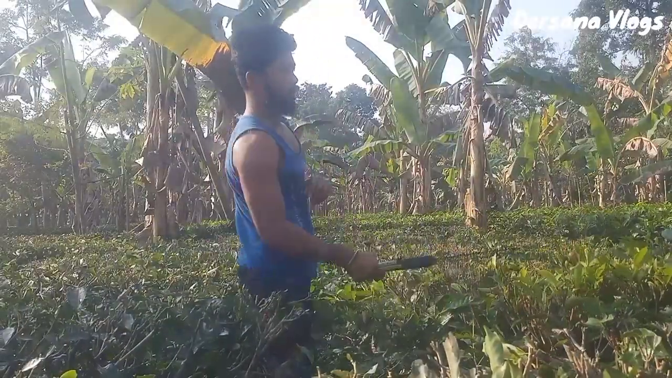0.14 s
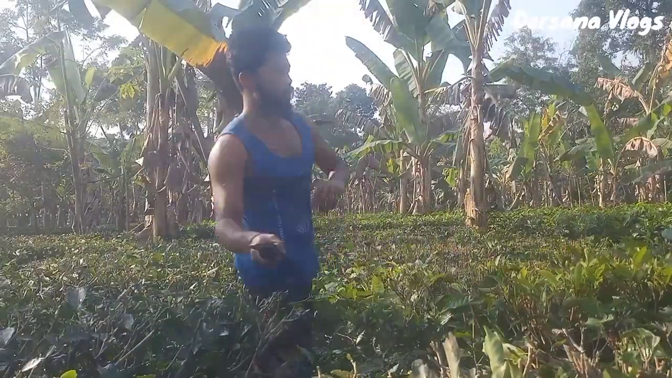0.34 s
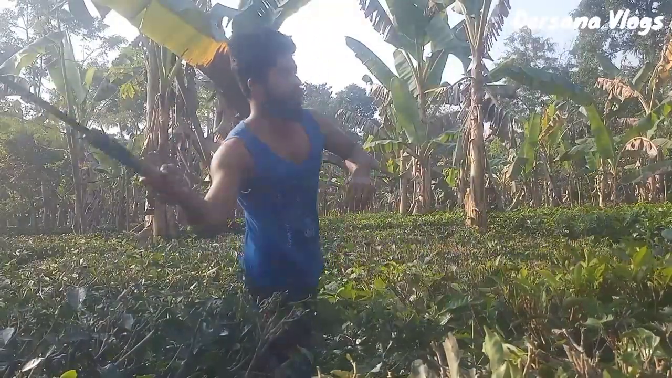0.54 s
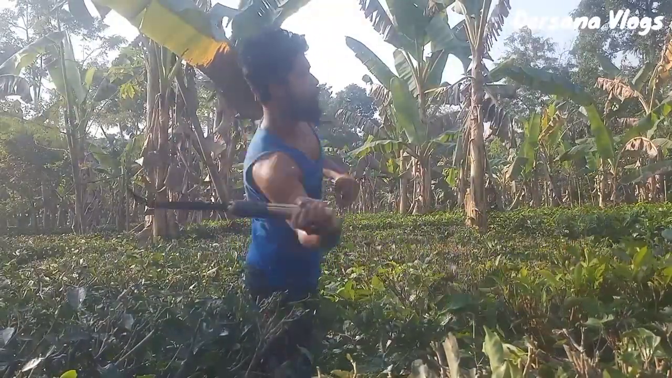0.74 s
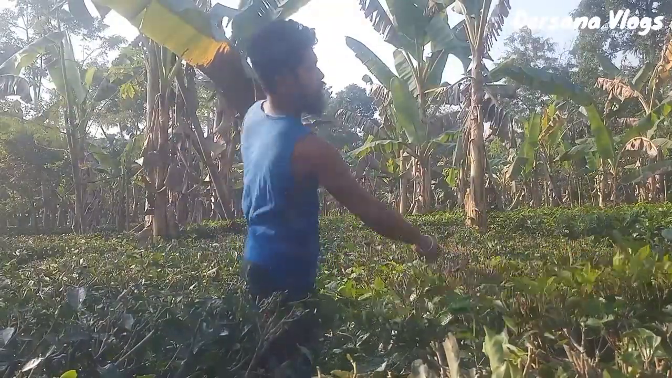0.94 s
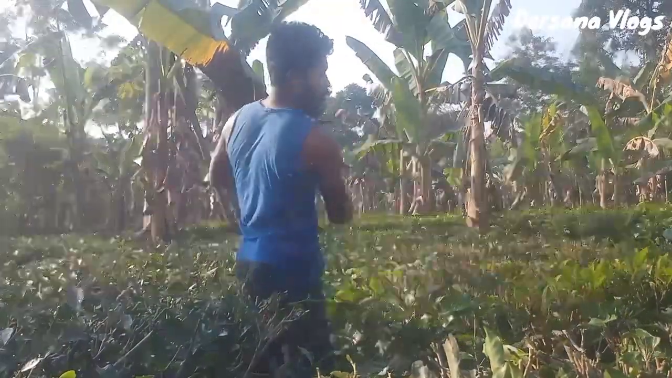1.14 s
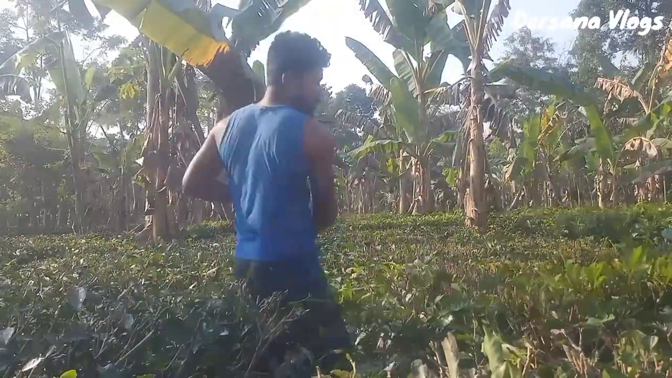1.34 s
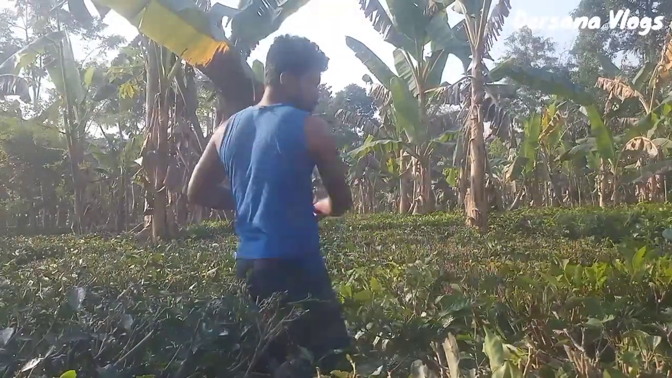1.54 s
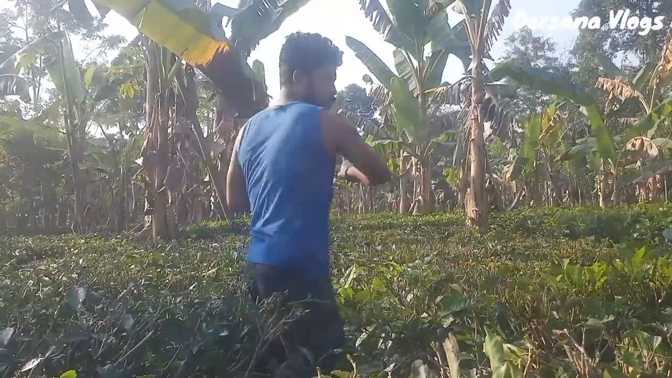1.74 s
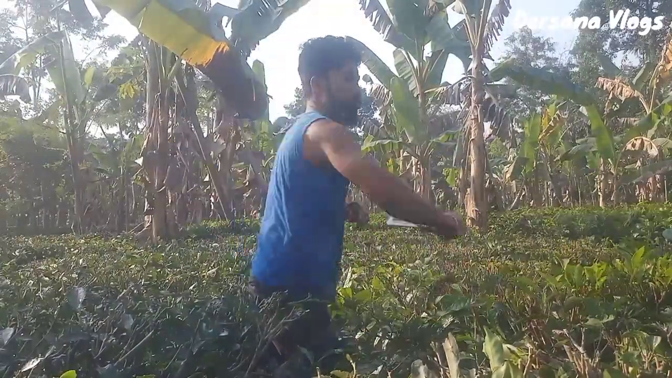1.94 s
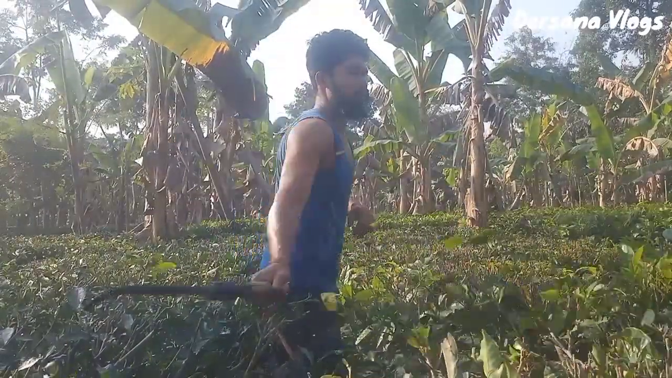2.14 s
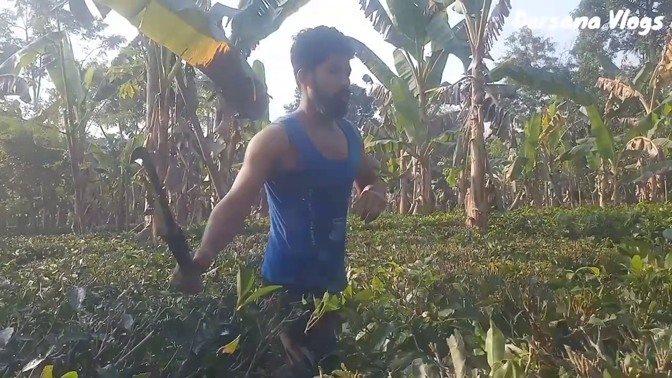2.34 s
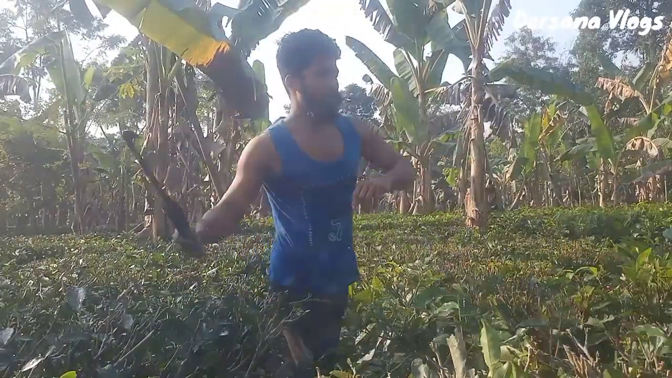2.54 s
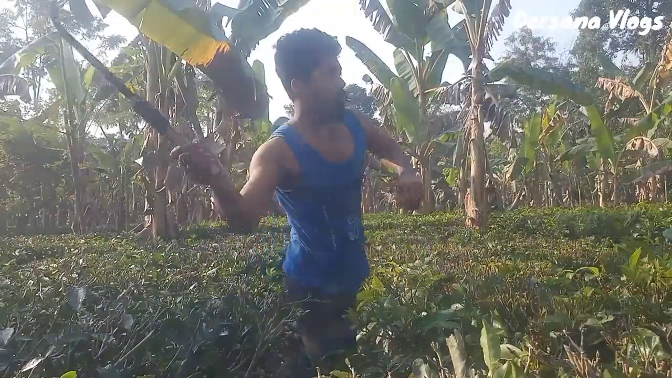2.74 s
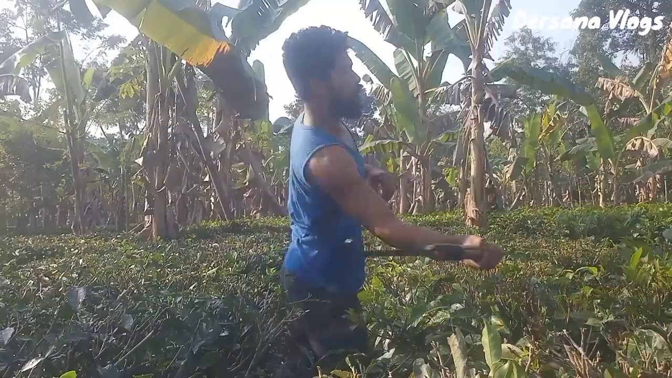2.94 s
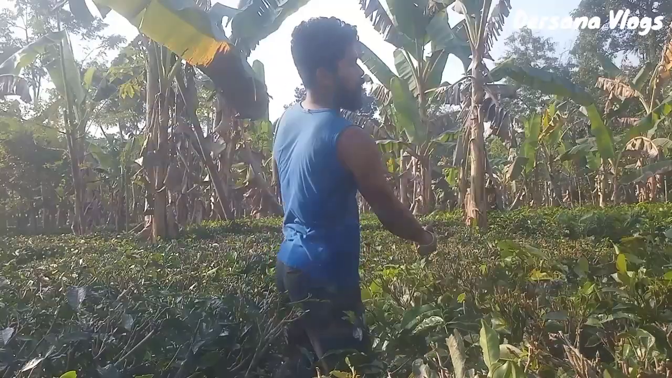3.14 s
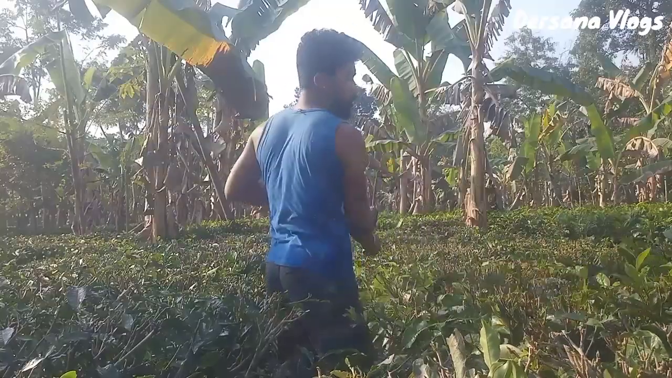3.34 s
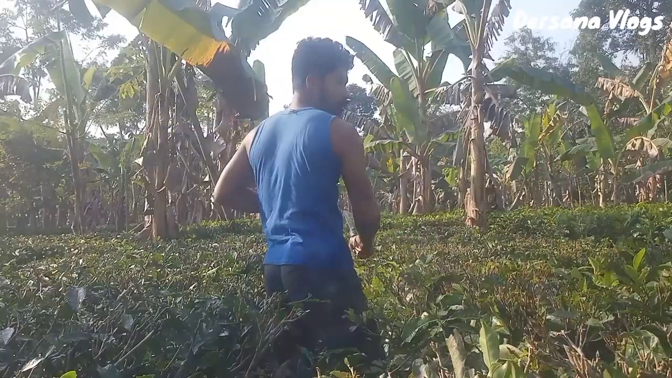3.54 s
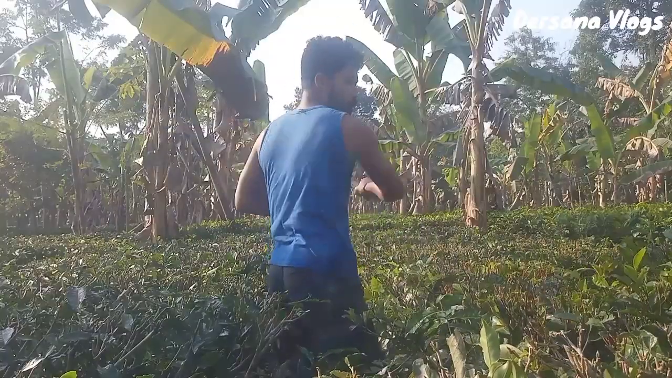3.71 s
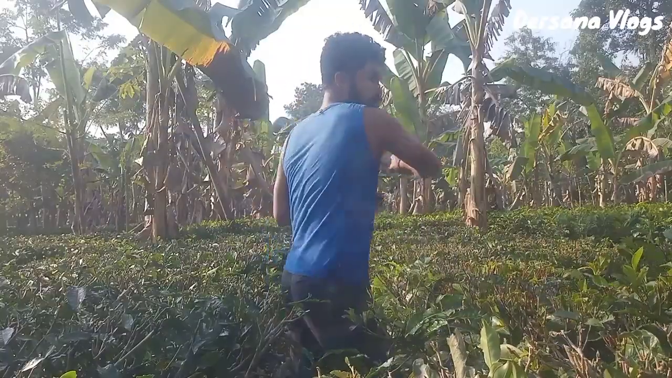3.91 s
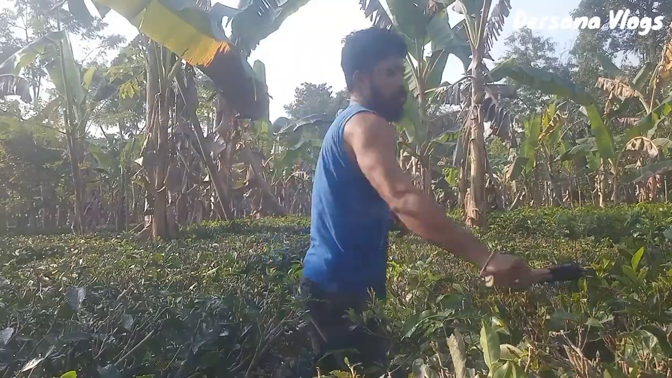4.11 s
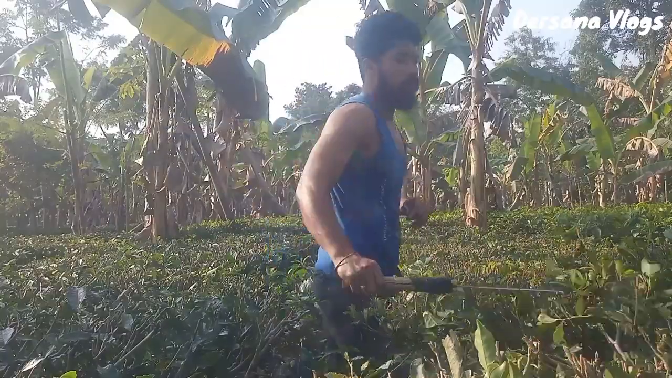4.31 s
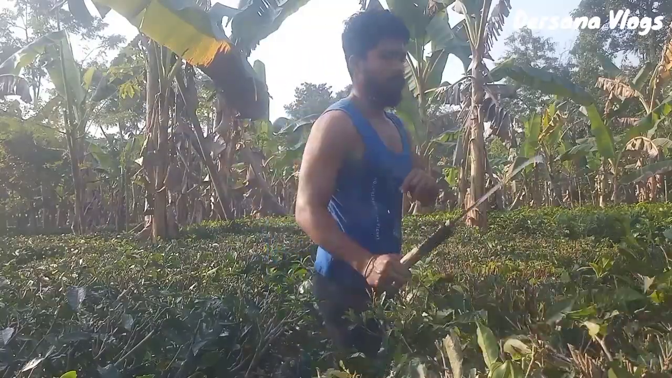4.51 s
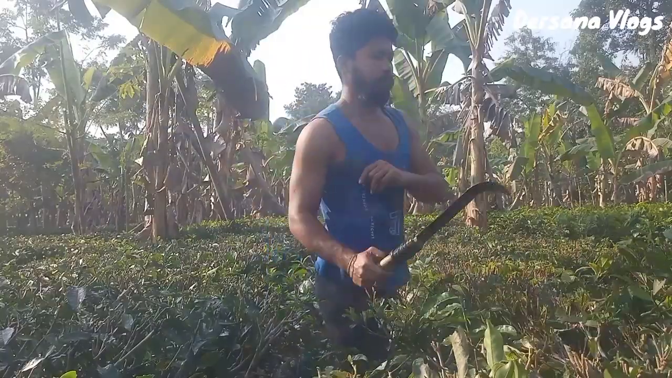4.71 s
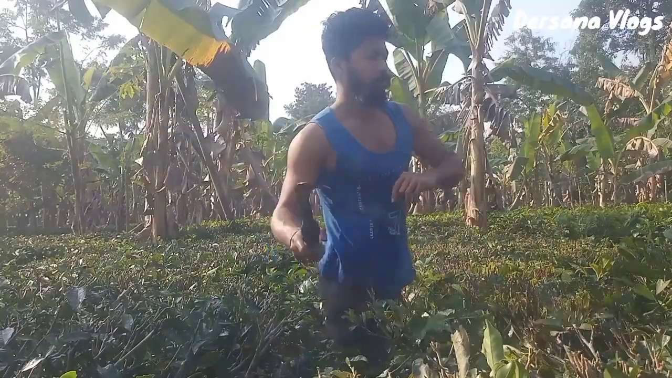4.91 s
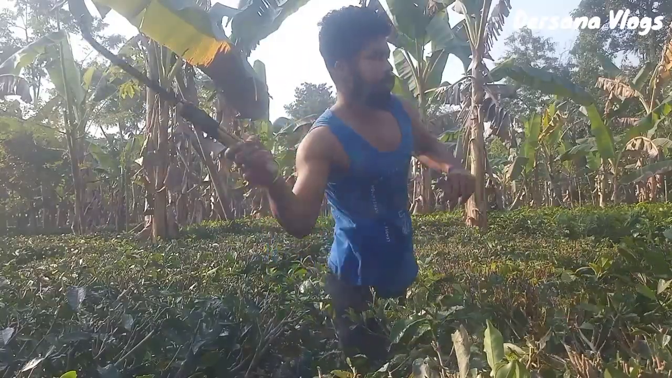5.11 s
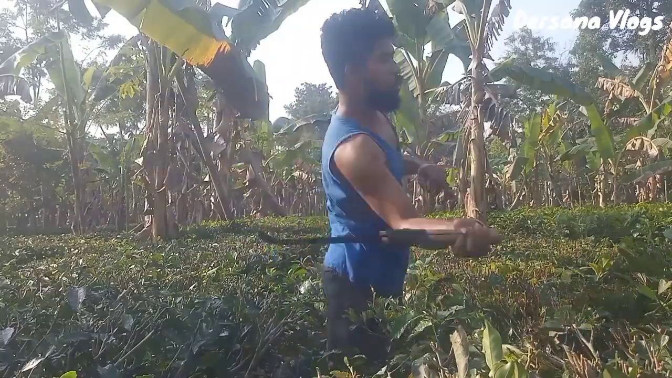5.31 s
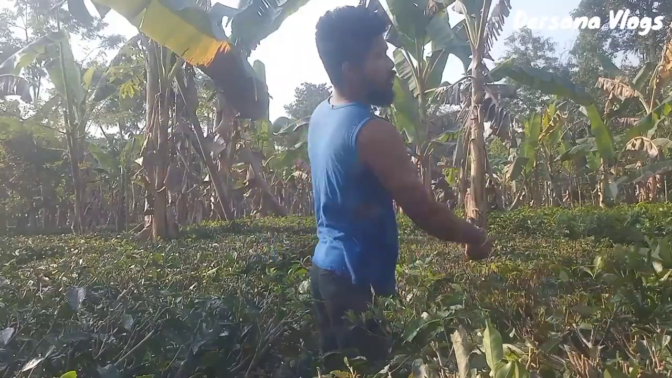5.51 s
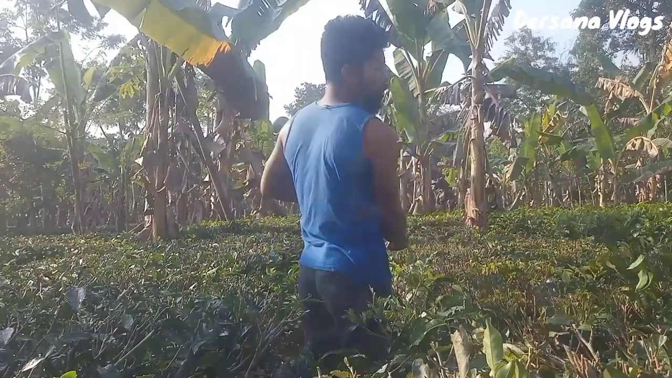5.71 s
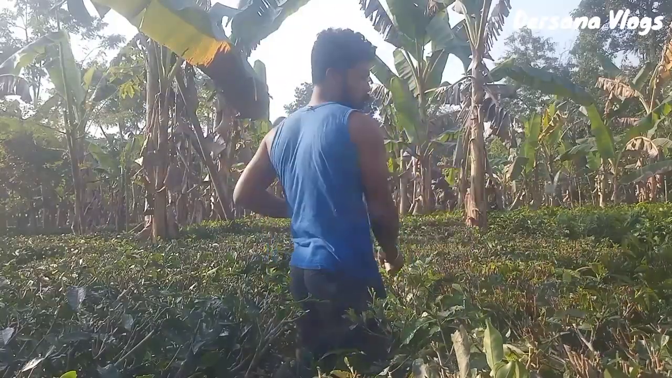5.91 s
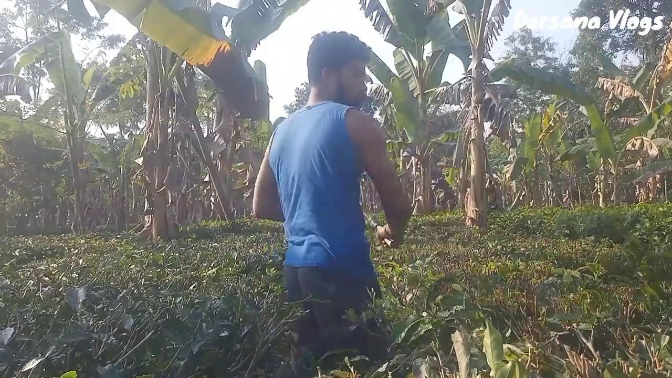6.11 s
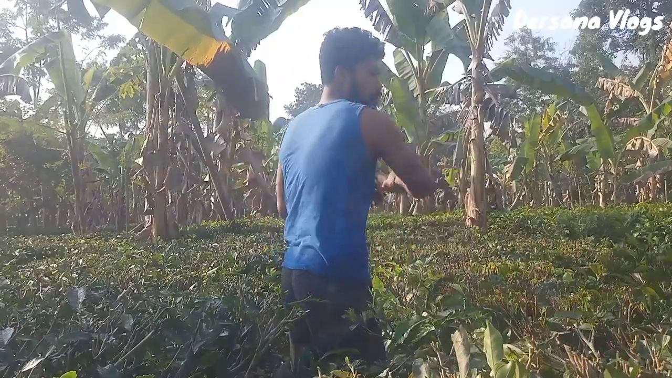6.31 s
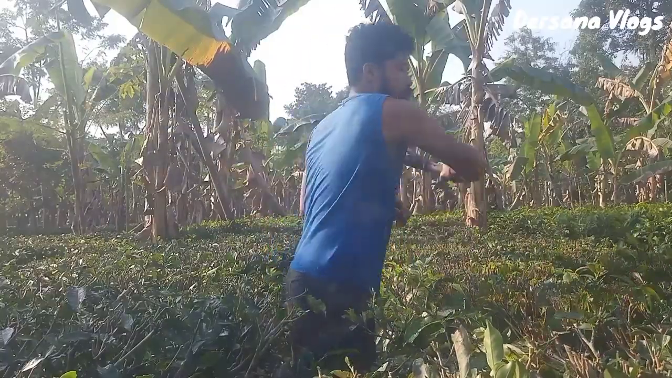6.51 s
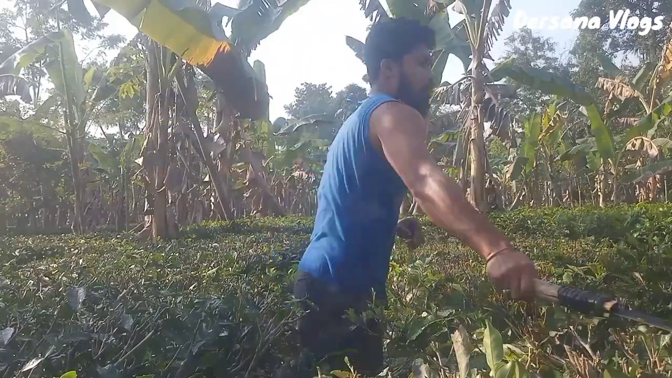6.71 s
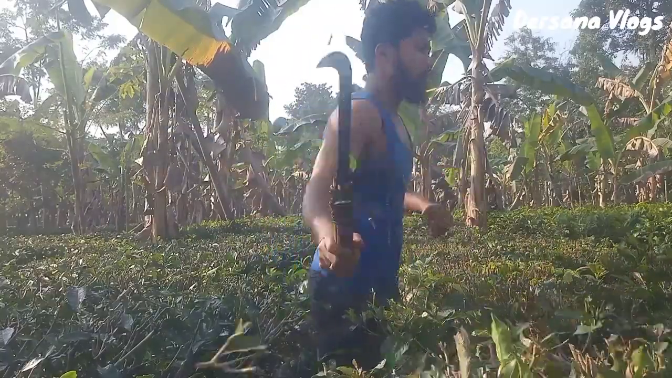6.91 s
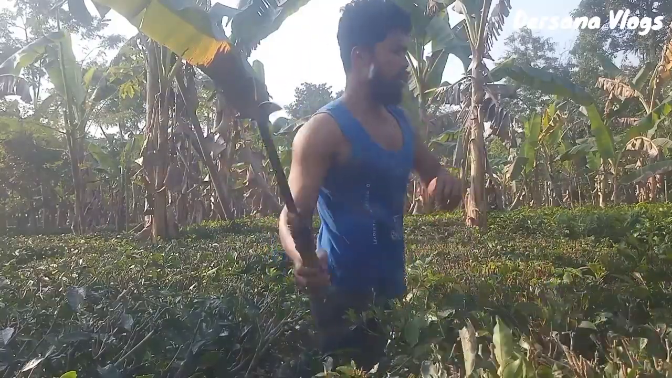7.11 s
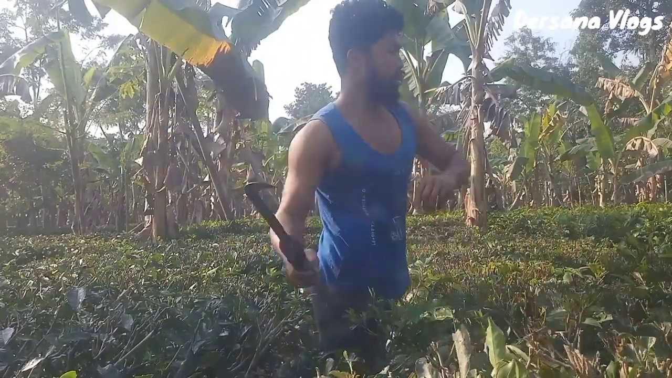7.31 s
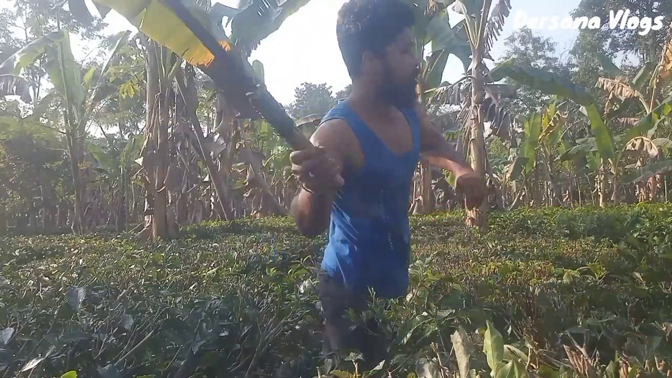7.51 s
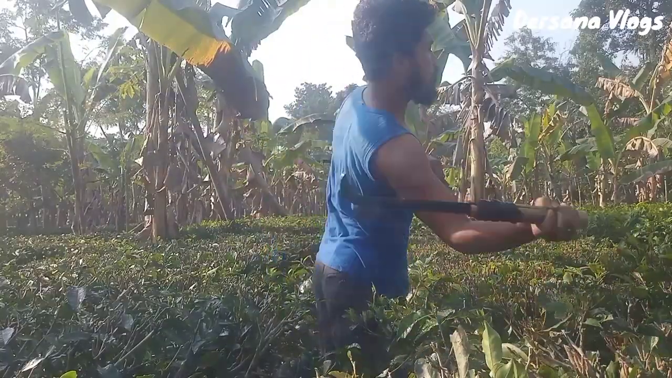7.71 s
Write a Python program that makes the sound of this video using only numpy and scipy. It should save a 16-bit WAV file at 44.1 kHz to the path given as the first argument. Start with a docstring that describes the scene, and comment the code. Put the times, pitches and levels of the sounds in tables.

```python
"""Slashing through bushes.

A long hooked blade cuts low leafy bushes six times, each stroke tearing a burst of fibres and stalks.
Cut bushes spring back, rustle and settle; legs and arm push through the leaves, twigs snap, wood knocks.
A small bird chirps thinly over faint open air. The loudest peaks overload the nearer, right microphone;
the left one is shadowed and hears the work later and duller."""
import sys
import numpy as np
from scipy import signal
from scipy.fft import rfft, irfft, next_fast_len
from scipy.io import wavfile

SR = 44100
rng = np.random.default_rng(int(sys.argv[2]) if len(sys.argv) > 2 else 0)


def store_wav(level_fs):
    """Save 16-bit WAV to argv[1]."""
    pcm = np.round(np.clip(np.atleast_2d(level_fs), -1, 1) * 32767)
    wavfile.write(sys.argv[1], SR, pcm.T.astype(np.int16))


N = 341775

# Each row: first touch, full bite and exit in seconds, level in dB, touch in dB re bite,
# drop on exit in dB, fade t60 in seconds, thud of thick stems in dB re bite.
BLADE_STROKES = [(1.049, 1.068, 1.086, -8.3, -18, -5.5, .22, -18),
                 (2.219, 2.229, 2.247, -6.5, -24, -3.5, .28, -16),
                 (3.191, 3.201, 3.218, -5.7, -26, -4.5, .25, -14),
                 (4.322, 4.329, 4.362, -7.7, -20, -4.0, .23, -14),
                 (5.583, 5.588, 5.611, -7.5, -24, -3.0, .25, -21),
                 (6.877, 6.882, 6.905, -9.0, -13, -1.5, .42, -16)]
# Cut bushes springing back, the first from an earlier stroke. Each row: start in seconds, shaking in dB,
# calming in dB per second, lingering rustle in dB, hush during the arm's next wind-up in dB.
BUSH_RECOILS = [(-.20, -27, 85, -46, 5.5), (1.089, -34, 90, -45.5, 3.5), (2.25, -28, 59, -43.5, 1.5),
                (3.22, -28, 90.5, -44, 1.5), (4.36, -29.5, 42.5, -44, 9), (5.61, -28.5, 112.5, -44.5, 4),
                (6.91, -28.5, 60, -43, -6)]
# Limbs in the bushes. Each row: middle and ramp in seconds, leaf level in dB, branches in dB re leaves.
LIMB_PUSHES = [(.28, 0.06, -50.5, -2.5), (.41, 0.041, -56.5, 0), (0.582, 0.024, -54.5, 0.5),
               (.82, 0.039, -55, -0.5), (1.248, 0.023, -47, 8), (1.42, 0.12, -54, 2.5),
               (1.758, 0.16, -49.5, -8), (2.80, 0.042, -46, -7), (2.89, 0.045, -49, -4),
               (3.019, 0.019, -41.5, -14), (3.60, 0.055, -46, -5.5), (4.05, 0.081, -60.5, -1),
               (4.632, .11, -36.5, -10.5), (4.90, 0.053, -46, -11), (5.28, 0.059, -51.5, -19),
               (5.858, 0.053, -45, -3), (6.318, 0.061, -48.5, -2), (6.522, .06, -51, -6.5),
               (7.20, 0.083, -39, -6.5), (7.37, 0.094, -44.5, -4)]
# Each row: start in seconds, relative level in dB, pitch and width in Hz, splintering t60 in seconds.
TWIG_SNAPS = [(0.2597, -19, 1640, 1290, .011), (0.8186, -21, 2070, 2600, 0.026),
              (0.915, -33, 2530, 400, 0.02), (1.072, -2, 2450, 900, 0.025), (1.181, -18, 2400, 3000, 0.029),
              (1.243, -15, 705, 1500, .022), (1.4255, -20, 1500, 2500, 0.042),
              (1.671, -20.5, 1870, 2300, 0.05), (1.7073, -23.5, 2760, 1500, .015),
              (2.3583, -10, 3000, 7000, 0.016), (3.0706, -14, 1840, 5400, 0.015),
              (3.7068, -22.5, 2000, 2600, 0.021), (3.7799, -21.5, 2370, 2000, 0.028),
              (4.0394, -21.5, 1820, 1600, 0.099), (4.3151, -3, 3160, 5000, .036),
              (4.4566, -8, 2400, 3500, .035), (5.0222, -22.5, 2200, 2800, .018),
              (5.636, -1, 1300, 3500, 0.055), (5.6664, -12, 2200, 4000, .022),
              (5.7258, -3.5, 1900, 200, 0.024), (5.838, -17, 2710, 3000, 0.028),
              (6.244, -24, 2300, 2500, 0.016), (7.335, -19, 2800, 5000, .026),
              (7.5417, -21, 2960, 600, .015)]
# Each row: start in seconds, level in dB, pitch in Hz, t60 in seconds.
WOOD_KNOCKS = [(1.7562, -16.5, 1100, .013), (5.935, -20, 910, .005), (6.6415, -15, 930, .005)]
# Each row: start and length in seconds, pitch at start, one third and end in Hz, level in dB.
BIRD_CHIRPS = [(.166, .042, 5900, 7050, 6950, -37), (.280, .072, 5700, 6500, 7000, -37),
               (.428, .055, 5550, 5300, 4200, -48), (2.814, .058, 6700, 7050, 6750, -34),
               (7.550, .034, 6050, 6550, 7050, -34), (7.662, .030, 5700, 6100, 7050, -39)]
# Source spectra. Each row: frequency in Hz, relative density in dB.
TEAR_SPECTRUM = [(30, -25), (60, -5), (110, -6), (190, -10.5), (350, -0.5), (700, 2), (1200, 1),
                 (2000, -2.5), (6500, 1), (15000, -1)]
LEAF_SPECTRUM = [(60, -9), (150, -9), (300, -5), (600, 1), (1200, 1), (2400, -0.5), (4200, -2), (6500, -4),
                 (15000, -5)]
AIR_SPECTRUM = [(25, -0.5), (90, 2), (200, -10), (500, -19.5), (2000, -13), (6500, -12), (15000, -16)]
# Microphone port, then the paths to the far port: bent round the housing, scattered by plants.
# Each row: frequency in Hz, gain in dB.
PORT_RESPONSE = [(25, -22), (45, -14.5), (80, -4), (300, -0.5), (1300, 0), (2400, 3.5), (3000, 2),
                 (4200, -4), (5500, -2.5), (6500, 2), (7200, -5.5), (8000, -17), (11500, -25.5),
                 (15500, -17.5)]
BENT_RESPONSE = [(60, -1.5), (250, -2), (600, -6.5), (1200, -13), (2400, -23), (4000, -38), (7000, -54),
                 (15000, -50)]
SCATTERED_RESPONSE = [(60, -5), (250, -18), (600, -16.5), (1200, -12), (2400, -21), (4000, -20.5),
                      (7000, -39), (15000, -25)]

SPRING_BACK_S, WIND_UP_S, LINGER_DB_PER_S = 0.044, 0.41, 9
GRAZE_S, GRAZE_DB = 0.042, -48.5  # blade on the outer leaves, just before the stems
SHAKE_WEIGHT_DB, LINGER_WEIGHT_DB = -7, -10.5  # branches re leaves
ROCKS_PER_S, ROCK_DB, ROCK_WEIGHT_DB = 30, 1.23, 1.7  # uneven rocking of the branches
KNOCK_HIGHPASS_HZ, FAR_LAG_S, CUTOFF_HZ = 258, .00014, 15700


def slashes():
    """The edge meets leaves, tears thousands of fibres a second, cracks stalks and leaves the bush."""
    t, force, thud = np.arange(N) / SR, np.zeros(N), np.zeros(N)
    for touch_s, bite_s, exit_s, level_db, touch_db, drop_db, t60_s, thud_db in BLADE_STROKES:
        entry_db = np.interp(t, [touch_s, bite_s], [touch_db, 0])
        exit_db = np.interp(t, [exit_s, exit_s + .016], [0, drop_db])
        fade_db = -60 * np.clip((t - exit_s) / t60_s, 0, 2)
        stroke = (t >= touch_s) * from_db(level_db + entry_db + exit_db + fade_db)
        force += stroke
        thud += from_db(thud_db) * stroke
    # Each sprig tears with its own colour.
    fibres = sum(band * from_db(1.8 * drift(160))
                 for _, band in crackle(per_s=4000, spread_db=2.2, hiss=.9))
    stalks = ticks(per_s=300, width_hz=170, spread_db=2.5)
    tearing = from_db(2) * rms_one(coloured(fibres, TEAR_SPECTRUM)) + from_db(-8.5) * stalks
    bass = rms_one(butter(rng.standard_normal(N), [70, 340], "band"))
    late_thud = np.interp(t - .006, t, thud)  # thick stems give way after the leaves
    return tearing * force + from_db(-6) * bass * late_thud


def bush_motion():
    """Recoils, grazes and pushes add in power; returns leaf level and branch weight re leaves, in dB."""
    t, motions = np.arange(N) / SR, []
    touches_s = [stroke[0] for stroke in BLADE_STROKES] + [np.inf]
    for (start_s, shake_db, calm_db_per_s, linger_db, hush_db), touch_s in zip(BUSH_RECOILS, touches_s):
        sprung = np.clip((t - start_s) / SPRING_BACK_S, 0, 1) * (t < touch_s)
        age_s = np.maximum(t - start_s - SPRING_BACK_S, 0)
        wind_up = np.clip(1 - (touch_s - t) / WIND_UP_S, 0, 1)
        shake = sprung * from_db(shake_db - calm_db_per_s * age_s)
        linger = sprung * from_db(linger_db - LINGER_DB_PER_S * age_s - hush_db * wind_up)
        graze = sprung * from_db(GRAZE_DB) * np.clip(1 - (touch_s - t) / GRAZE_S, 0, 1)
        motions += [(shake, SHAKE_WEIGHT_DB), (linger, LINGER_WEIGHT_DB), (graze, LINGER_WEIGHT_DB)]
    for middle_s, ramp_s, level_db, weight_db in LIMB_PUSHES:
        push = from_db(level_db) * np.maximum(1 - np.abs(t - middle_s) / ramp_s, 0)
        motions.append((push, weight_db))
    leaf_power = 1e-9 + sum(gain ** 2 for gain, _ in motions)
    branch_power = 1e-10 + sum((gain * from_db(weight_db)) ** 2 for gain, weight_db in motions)
    return (10 * np.log10(leaf_power) + ROCK_DB * drift(ROCKS_PER_S),
            10 * np.log10(branch_power / leaf_power) + ROCK_WEIGHT_DB * drift(ROCKS_PER_S))


def rustle():
    """Leaves collide: bright hiss when shaken, single ticks when settling. Swaying branches add body."""
    level_db, weight_db = bush_motion()
    vigour = np.clip((level_db + 56) / 25, 0, 1.3)
    body = from_db(1.03 * (weight_db + 9.5))
    shine = from_db(4.1 * (vigour - .5))
    # Sprigs brush past in clumps, more distinct as the bush calms.
    clumping_db = 2.1 - .8 * vigour
    brushing, sprigs = np.zeros(N), drift(90)
    for hz, band in crackle(per_s=600 * from_db(12 * vigour), spread_db=1.5, hiss=1):
        clumps = from_db(clumping_db * (.7 * sprigs + drift(80)))
        brushing += band * clumps * (body if hz < 1000 else shine if hz > 3500 else 1)
    brushing = from_db(8) * rms_one(coloured(brushing, LEAF_SPECTRUM))
    ticking = from_db(-2 - 6 * vigour) * ticks(per_s=45 * from_db(22 * vigour), width_hz=200, spread_db=4)
    faint_twigs = from_db(-6 - 7 * vigour) * ticks(per_s=22, width_hz=840, spread_db=1.5)
    return from_db(level_db) * (brushing + ticking + faint_twigs)


def crackle(per_s, spread_db, hiss):
    """Tiny random contacts over a blur of weaker ones, differing per band; yields (centre Hz, band)."""
    sizes = from_db(spread_db * np.minimum(rng.exponential(1, N), 3.5))
    chance = np.clip(per_s / SR, 1e-4, 1)
    clicks = rms_one(sizes * (rng.random(N) < chance) / np.sqrt(chance))
    envelope = np.sqrt((clicks ** 2 + hiss ** 2) / (1 + hiss ** 2))
    edges_hz = np.geomspace(40, 17000, 16)
    for low_hz, high_hz in zip(edges_hz, edges_hz[1:]):
        drive = rng.standard_normal(N) * envelope
        yield np.sqrt(low_hz * high_hz), butter(drive, [low_hz, high_hz], "band")


def ticks(per_s, width_hz, spread_db):
    """Stiff leaves and stalks click, each ringing at its own pitch, mostly a middle one; rms 1."""
    chance = np.clip(per_s / SR, 1e-4, 1)
    sizes = from_db(spread_db * np.minimum(rng.exponential(1, N), 2.5)) * rng.choice([-1, 1], N)
    clicks = sizes * (rng.random(N) < chance) / np.sqrt(chance)
    pitches_hz = np.geomspace(1150, 4400, 22)
    pitch_index = (rng.triangular(0, .5, 1, N) * len(pitches_hz)).astype(int)
    return rms_one(sum(resonance(clicks * (pitch_index == k) + 1e-18, hz, width_hz)
                       for k, hz in enumerate(pitches_hz)))


def twigs():
    """A crack and a spray of splinters ring each twig; thin green wood gives little bass or top."""
    out, t = np.zeros(N), np.arange(SR // 10) / SR
    for start_s, level_db, hz, width_hz, t60_s in TWIG_SNAPS:
        fracture = .14 * rng.standard_normal(len(t)) * from_db(-60 * t / t60_s)
        fracture[0] = 1  # the crack
        band_hz = [min(hz / 2, 400), min(hz + width_hz, SR / 3)]
        snap = butter(resonance(fracture, hz, width_hz), band_hz, "band")
        add(out, start_s, from_db(level_db + 12) * snap / np.linalg.norm(snap))
    return out


def knocks():
    """Dry knocks of wood, one damped mode each."""
    out, t = np.zeros(N), np.arange(SR // 10) / SR
    for start_s, level_db, hz, t60_s in WOOD_KNOCKS:
        ring = from_db(level_db - 60 * t / t60_s) * np.sin(2 * np.pi * hz * t)
        add(out, start_s, butter(ring, KNOCK_HIGHPASS_HZ, "high"))
    return out


def bird():
    """Thin fluttering whistles; most flick up, then glide."""
    out = np.zeros(N)
    for start_s, length_s, start_hz, knee_hz, end_hz, level_db in BIRD_CHIRPS:
        progress = np.linspace(0, 1, int(length_s * SR))
        flutter = drift(350)[:len(progress)]
        hz = np.interp(progress, [0, 1 / 3, 1], [start_hz, knee_hz, end_hz]) * (1 + .012 * flutter)
        envelope = from_db(level_db + 2 * flutter) * np.sin(np.pi * progress)
        add(out, start_s, envelope * np.sin(2 * np.pi * np.cumsum(hz) / SR))
    return out


def foliage_echo(x, t60_s):
    """Dense reflections from leaves and trunks."""
    t = np.arange(SR // 2) / SR
    echoes = rng.standard_normal(len(t)) * from_db(-60 * t / t60_s)
    return signal.fftconvolve(x, echoes / np.linalg.norm(echoes))[:N]


def open_air():
    """Faint rumble and hiss, wavering in level."""
    noise = rms_one(coloured(rng.standard_normal(N), AIR_SPECTRUM))
    return noise * from_db(-52 + 3.1 * drift(11))


def far_port(near):
    """Sound reaches the shadowed port late, bent round the housing and scattered by plants."""
    t = np.arange(N) / SR
    delayed = np.interp(t - FAR_LAG_S, t, near)
    # Each leaf sounds from another place, so the scattered paths keep changing.
    lags_s = rng.uniform(.0003, .006, 12)
    roaming = sum(np.interp(t - lag_s, t, near) * drift(250) for lag_s in lags_s) / np.sqrt(8)
    return coloured(delayed, BENT_RESPONSE) + coloured(roaming, SCATTERED_RESPONSE)


def from_db(db):
    """Decibels to gain."""
    return 10 ** (np.asarray(db) / 20)


def rms_one(x):
    """Scale to rms 1."""
    return x / np.sqrt(np.mean(x ** 2) + 1e-20)


def coloured(x, spectrum):
    """Minimum-phase filter from (Hz, dB) points, interpolated in log frequency."""
    size = 2 * next_fast_len(N // 2 + SR // 10)
    points_hz, points_db = np.transpose(spectrum)
    bins_hz = np.maximum(np.arange(size // 2 + 1) * SR / size, 1)
    gain_db = np.interp(np.log(bins_hz), np.log(points_hz), points_db)
    cepstrum = irfft(np.log(from_db(gain_db)))
    cepstrum[1:size // 2] *= 2
    return irfft(rfft(x, size) * np.exp(rfft(cepstrum[:size // 2], size)))[:N]


def drift(per_s):
    """Random line through unit-variance knots."""
    knots = rng.standard_normal(N // 20)
    return np.interp(np.arange(N) / SR * per_s, np.arange(len(knots)), knots)


def resonance(x, hz, width_hz):
    """Two-pole resonance, peak gain 1."""
    return signal.lfilter(*signal.iirpeak(hz, hz / min(width_hz, SR / 4), fs=SR), x)


def butter(x, hz, kind):
    """Filter with 12 dB per octave skirts."""
    return signal.sosfilt(signal.butter(2, hz, kind, fs=SR, output="sos"), x)


def add(track, start_s, sound):
    """Mix a sound in at start_s."""
    start = int(start_s * SR)
    track[start:start + len(sound)] += sound[:max(N - start, 0)]


def scene():
    """All sources at two ports: far on the left, near on the right."""
    air = open_air()
    small_sounds = twigs() + knocks() + bird()
    echo = from_db(-14) * foliage_echo(small_sounds, t60_s=.16)
    near = coloured(slashes() + rustle() + small_sounds + echo + air, PORT_RESPONSE)
    return np.array([far_port(near), near])


def record(dry):
    """Soft overload on peaks; deepest bass and top cut."""
    clipped = dry / (1 + (dry / .95) ** 6) ** (1 / 6)
    thinned = butter(clipped, 45, "high")
    return signal.sosfilt(signal.ellip(10, .3, 70, CUTOFF_HZ, fs=SR, output="sos"), thinned)


dry = scene()
out = record(dry)
store_wav(out)
```